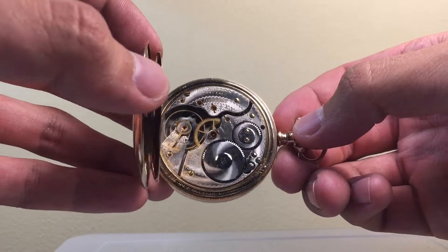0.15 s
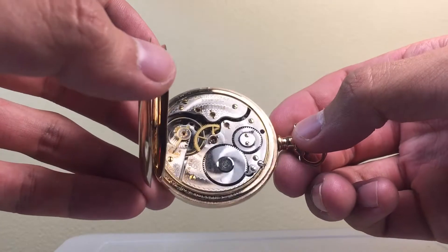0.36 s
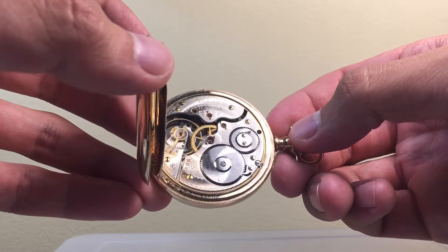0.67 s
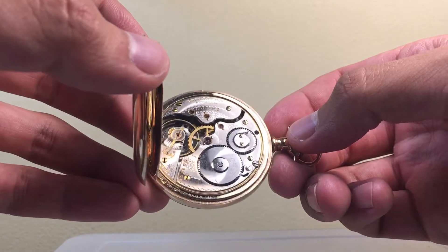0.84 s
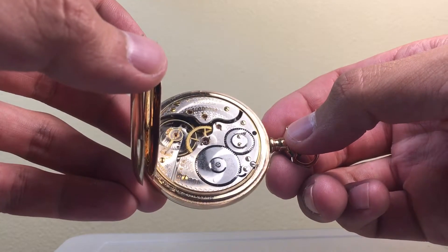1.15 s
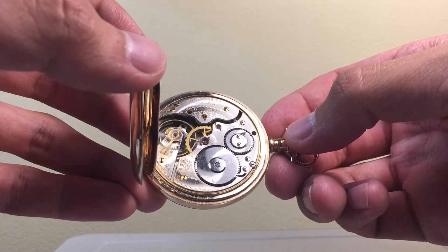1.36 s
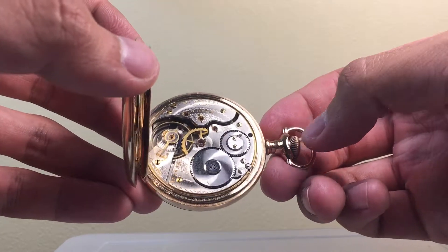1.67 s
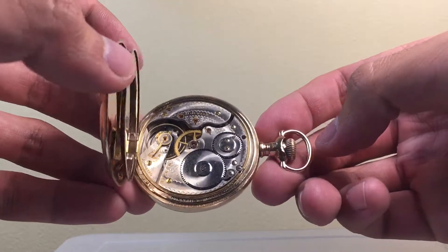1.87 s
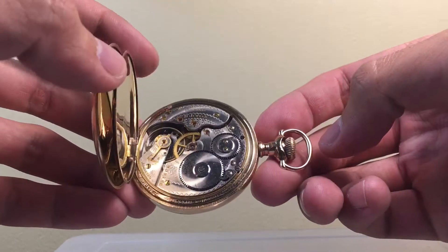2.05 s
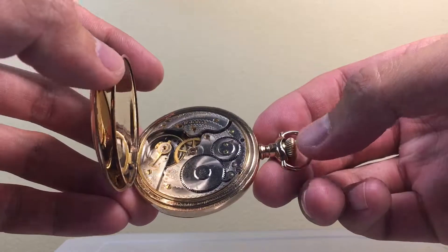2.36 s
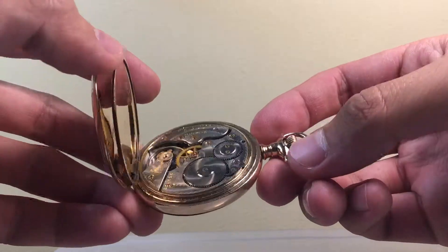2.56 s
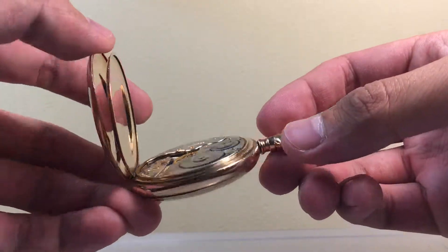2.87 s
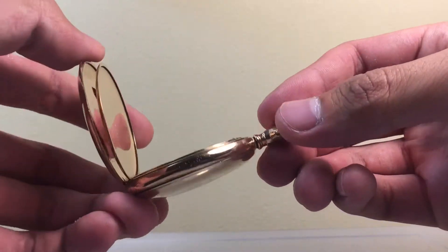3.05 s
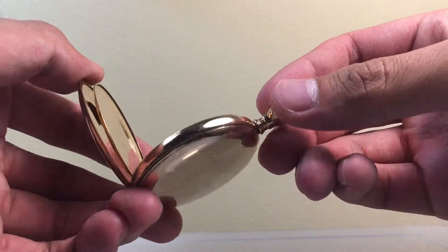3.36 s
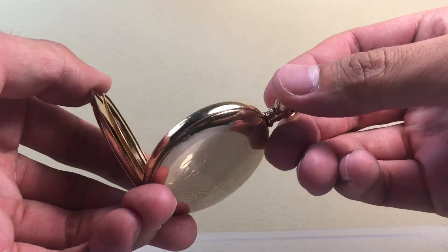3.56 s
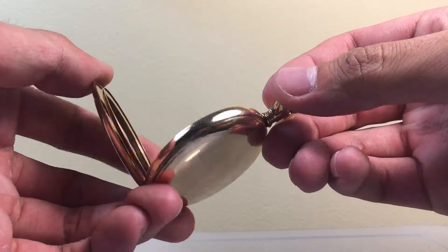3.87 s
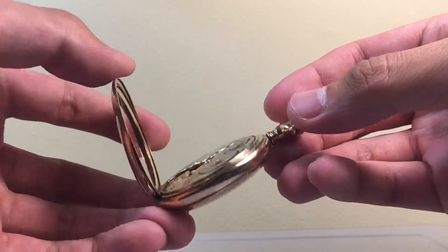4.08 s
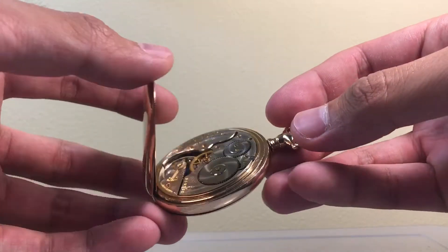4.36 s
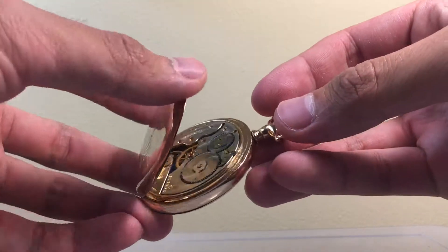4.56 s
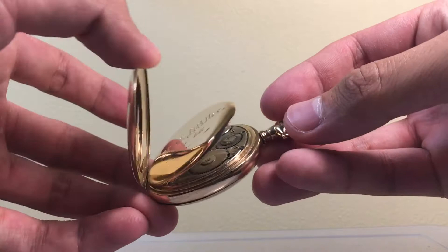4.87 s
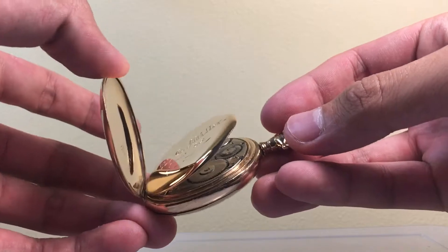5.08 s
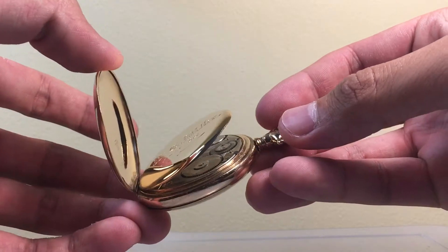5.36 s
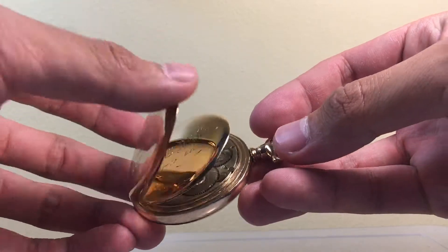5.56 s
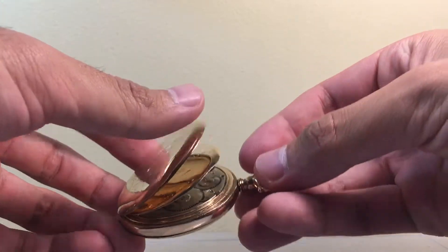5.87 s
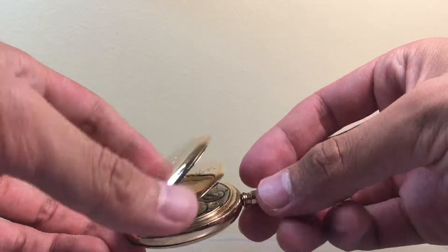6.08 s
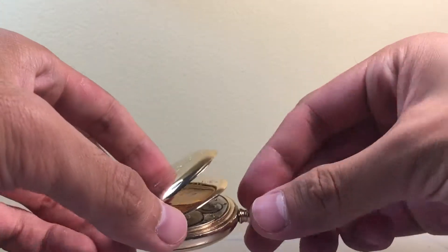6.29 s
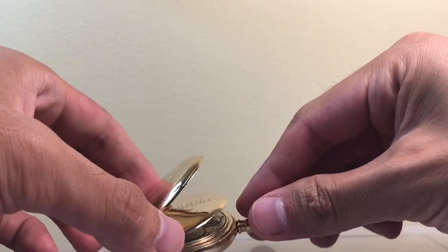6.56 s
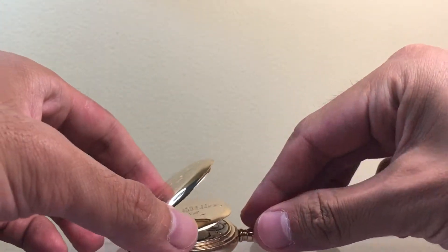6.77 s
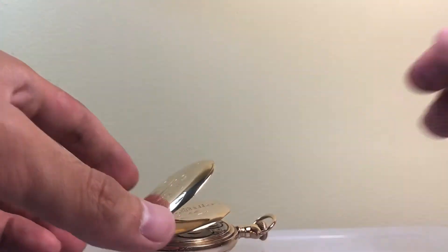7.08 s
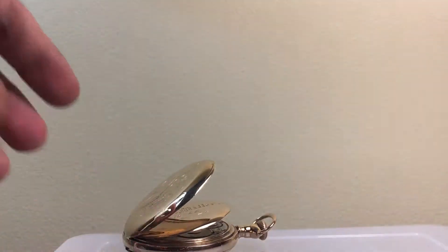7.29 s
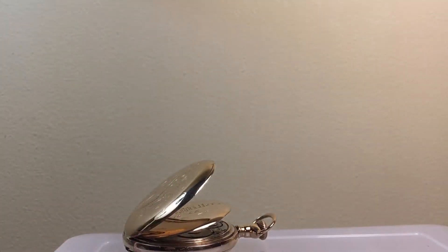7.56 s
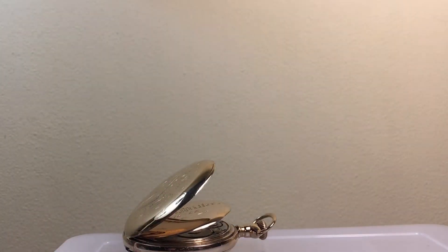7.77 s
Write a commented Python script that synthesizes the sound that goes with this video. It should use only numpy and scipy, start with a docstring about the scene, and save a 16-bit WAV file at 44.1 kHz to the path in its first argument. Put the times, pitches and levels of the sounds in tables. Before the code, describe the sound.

A pocket watch ticks quickly while being handled, its cover snaps open, and it is set down on a plastic box with a hollow knock.

```python
"""An open pocket watch ticks five times a second as it is turned in the hands: each beat is a series of
tiny impacts in the escapement that set the plates and case ringing. A lamp buzzes faintly, its
resonances driven by the mains, in a quiet ventilated room. Bow and hinge click, the inner cover snaps
open and a fingertip slips on the case. The watch is set down on a hollow plastic box, whose walls
boom at the blow and answer light nudges; let go, the case rocks and chatters to rest."""
import sys
import numpy as np
from scipy import signal
from scipy.fft import rfft, irfft, next_fast_len
from scipy.io import wavfile

SR = 44100
rng = np.random.default_rng(int(sys.argv[2]) if len(sys.argv) > 2 else 0)


def wav_record(signal):
    """Record a signal, one row per channel, as 16-bit PCM in the file named by sys.argv[1]."""
    frames = np.transpose(np.atleast_2d(signal))
    bounded = np.clip(frames, -1, 1)
    # unit amplitude maps onto the largest positive 16-bit level
    quanta = np.round(bounded * 32767).astype(np.int16)
    wavfile.write(sys.argv[1], SR, quanta)


N = 349713
TIME = np.arange(N) / SR
AGE = TIME[:SR // 2]   # seconds since a blow
SCATTER_DB = 3   # spread of a mode's strength from blow to blow


def from_db(db):
    """Amplitude grows tenfold for every 20 dB."""
    return 10 ** (np.asarray(db) / 20)


def rms_one(x):
    """Normalisation to unit mean power."""
    return x / np.sqrt(np.mean(x ** 2) + 1e-20)


def decay(t60):
    """Exponential damping: 60 dB are lost in t60 seconds."""
    return np.exp(-np.log(1000) * AGE / t60)


def colour(white, spectrum):
    """Spectral shaping: noise of unit rms, silent beyond the ends of the given spectrum."""
    hz, db = np.transpose(spectrum)
    bins = np.fft.rfftfreq(len(white), 1 / SR)
    gain = from_db(np.interp(np.log(bins + 1e-9), np.log(hz), db, left=-np.inf, right=-np.inf))
    return rms_one(irfft(rfft(white) * gain, len(white)))


def burst(spectrum, t60):
    """High modal density: countless close modes, struck together, merge into decaying noise."""
    return colour(rng.standard_normal(len(AGE)), spectrum) * decay(t60)


def ring(modes, vary_db=0, phase=0):
    """Modal superposition: a struck body vibrates as a sum of damped sinusoids."""
    return sum(from_db(db + vary_db * rng.normal()) * decay(t60) * np.sin(2 * np.pi * hz * AGE + phase)
               for hz, db, t60 in modes)


def add(out, s, sound):
    """Linear superposition: a sound joins the mix at s seconds."""
    at = max(round(s * SR), 0)
    out[at:at + len(sound)] += sound[:max(N - at, 0)]


def high_pass(x, hz):
    """A second-order filter: the lows fall by 12 dB an octave."""
    return signal.sosfilt(signal.butter(2, hz, "high", fs=SR, output="sos"), x)


def along(curve, s):
    """Linear interpolation of each column of a curve at s seconds."""
    times, *columns = np.transpose(curve)
    return [np.interp(s, times, column) for column in columns]


# The movement turns and is shaded by the hands. Each row: time in seconds, level of a drop in dB,
# lift above 11 kHz in dB.
FACING = [(0, -51.5, 7), (1.7, -52, 11), (2.5, -52, 10), (3.05, -55.5, 6), (3.6, -59.5, 5), (4.15, -52, 3),
          (4.5, -55.5, 7.5), (5.6, -53.5, 6.5), (6.1, -60, 4), (6.45, -55.5, -1), (7.1, -58.5, -2),
          (7.9, -59.5, 9)]
# The case rings more once let go. Each row: time in seconds, gain of its free modes in dB.
FREEDOM = [(0, -24), (6.8, -28), (7.03, -5), (7.25, -2.5), (7.43, 1.5), (7.93, 2)]
# Entry pallet, then exit pallet. Each row: lead of unlocking in seconds, gain in dB, lever gain in dB.
PALLETS = [(0.0192, 0, -17.5), (0.0206, 0.4, -21)]
# Plates and case under a beat. Each row: frequency in Hz, relative spectral density in dB.
CASE_SPECTRUM = [(2000, -13), (5000, -10.5), (6200, -13), (7200, 0), (8300, 4.5), (9600, 2), (10500, -7.5),
                 (11800, -2), (12700, -0.5), (14300, -1.5), (15500, -9), (16500, -33)]
# Modes of the pallets (a list for each), the free case and the lever. Each row: frequency in Hz,
# relative level in dB, t60 in seconds.
PALLET_MODES = [
    [(7000, -9, 0.028), (9700, -18, 0.036), (11600, -24, 0.022)],
    [(8160, -8, 0.027), (11000, -16, .03), (12350, -9, .03)],
]
FREE_CASE_MODES = [(7060, 6, 0.042), (9660, -4, 0.037), (8400, -14, .04)]
LEVER_MODES = [(3700, -3.5, .025), (4220, -1, 0.045), (5450, -3, .02)]


def beat(s, pallet, voice, t60=0.026, modes_db=-1.0, lever_follows=0.31, chance=0.83):
    """Impact excitation: five contacts of steel on jewel, returned as (seconds after the drop, sound)."""
    unlock_db, impulse_db, rebound_db, rebound_spread_db = -16, -21, -8.5, 4.5   # relative to the drop
    drop_db, bright_db = along(FACING, s)
    free_db, = along(FREEDOM, s)
    lead_s, pallet_db, lever_db = PALLETS[pallet]
    spectrum = [(hz, db + bright_db * (hz > 11000)) for hz, db in CASE_SPECTRUM]
    envelope = decay(t60) + from_db(2.0) * decay(0.0055)   # ringing plates and a very short crack

    def contact(db):
        """Partial correlation: a pallet keeps its own voice but is never struck quite alike."""
        return from_db(db) * colour(voice + chance * rng.standard_normal(len(AGE)), spectrum) * envelope

    pallet_ring = from_db(modes_db) * ring(PALLET_MODES[pallet], SCATTER_DB)
    case_ring = from_db(free_db) * ring(FREE_CASE_MODES, SCATTER_DB)
    # the lever is heard best while the open movement faces the listener
    lever_gain = from_db(lever_db + lever_follows * bright_db)
    contacts = [
        (-lead_s, contact(unlock_db) + 0.78 * lever_gain * ring(LEVER_MODES, SCATTER_DB)),
        (-lead_s + rng.uniform(0.001, 0.0032), contact(impulse_db)),
        (-lead_s * rng.uniform(0.5, 0.6), contact(impulse_db)),
        (0, contact(0) + pallet_ring + case_ring + lever_gain * ring(LEVER_MODES, SCATTER_DB)),   # drop
        (rng.uniform(0.0022, 0.0036), contact(rebound_db + rebound_spread_db * rng.normal()))]
    return [(lag, from_db(drop_db + pallet_db) * sound) for lag, sound in contacts]


# The rate wanders with tilt. Each row: time in seconds, lag behind an even count in seconds.
BEAT_LAG = [(0, .0365), (.6, .036), (2.4, .032), (4.6, .0314), (5.3, .0293), (6.5, .0286), (7.2, .031)]


def escapement(beat_s, beat_error_s):
    """Periodic impacts: two pallets catch the escape wheel in turn; out of beat, each tock is early."""
    out = np.zeros(N)
    voices = rng.standard_normal((2, len(AGE)))
    for k, count_s in enumerate(np.arange(0, TIME[-1], beat_s)):
        pallet = k % 2
        s = count_s + along(BEAT_LAG, count_s)[0] - beat_error_s * pallet
        for lag, sound in beat(s, pallet, voices[pallet]):
            add(out, s + lag, sound)
    return out


def mains_kicks(alternate_gain, skew_s, start_s, mains_hz=59.982):
    """An impulse train: one kick per half wave, every second one scaled and delayed by the skew."""
    kicks = np.zeros(N)
    for k in range(int(TIME[-1] * 2 * mains_hz)):
        at = (start_s + k / (2 * mains_hz) + skew_s * (k % 2)) * SR
        impulse = np.sinc(np.arange(-8, 9) - at % 1)   # falls between samples
        add(kicks, int(at) / SR, alternate_gain ** (k % 2) * impulse)
    return kicks


# Hands shade the lamp. Each row: time in seconds, relative levels of lower and upper resonance in dB.
BUZZ_LEVELS = [(0.0, -74, -77), (0.4, -79.5, -77.5), (1.5, -79, -75.5), (2.27, -72.5, -74.5),
               (2.72, -76.5, -77), (3.5, -71, -80), (4.25, -72.5, -83), (4.7, -70, -69.5),
               (5.1, -71.5, -78.5), (5.8, -72, -73), (6.5, -79, -80.5), (7.93, -76.5, -74.5)]
# The lamp's two resonances. Each row: frequency in Hz, relative level in dB, t60 in seconds.
LAMP_LOWER_MODES = [(7300, -2.5, .022), (7380, 3.5, 0.021), (7480, 2, 0.025)]
LAMP_UPPER_MODES = [(7650, 21, 0.0078), (7480, -13.5, 0.0053)]
# Loose parts of the lamp. Each row: frequency in Hz, relative spectral density in dB.
SIZZLE_SPECTRUM = [(4500, -16), (5400, 0.5), (5750, -14), (6050, 1), (6800, 0.5), (8600, -10), (9500, -4.5),
                   (10150, -9), (11400, -16), (12500, -5), (13900, -9), (14900, -3), (15700, -6)]


def lamp(lower_gain_db, upper_gain_db, sizzle_db, sizzle_t60, sizzle_follows):
    """Forced vibration: the current kicks two resonances to and fro, and loose parts sizzle in step."""
    swing = mains_kicks(alternate_gain=-0.95, skew_s=0.000005, start_s=0.0047)
    lower_db, upper_db = along(BUZZ_LEVELS, TIME)
    buzz = np.zeros(N)
    for db, modes in [(lower_db + lower_gain_db, LAMP_LOWER_MODES),
                      (upper_db + upper_gain_db, LAMP_UPPER_MODES)]:
        # passing the resonance twice, each kick swells and fades softly
        response = signal.fftconvolve(ring(modes), ring(modes))
        buzz += from_db(db) * rms_one(signal.fftconvolve(swing, response)[:N])
    shaking = mains_kicks(alternate_gain=0.7, skew_s=0, start_s=0.0045)
    sizzle = signal.fftconvolve(shaking, burst(SIZZLE_SPECTRUM, sizzle_t60))[:N]
    shade_db = sizzle_follows * (lower_db - lower_db.mean())
    return buzz + from_db(sizzle_db + shade_db) * rms_one(sizzle)


# Ventilation rumble, moving air and hiss. Each row: frequency in Hz, relative spectral density in dB.
RUMBLE_SPECTRUM = [(15, -58), (25, -16), (30, -30), (39, -9), (59, 2), (70, 0.5), (91, -9), (123, -2),
                   (155, -5.5), (188, -9.5), (215, -6.5), (258, -16), (353, -17.5), (450, -29), (580, -57),
                   (990, -120)]
AIR_SPECTRUM = [(240, -19), (400, -3), (470, 0), (655, 0.5), (795, -3.5), (1610, -4), (1820, -7.5),
                (2250, -3), (2700, -11), (3420, -10), (4290, -14), (4820, -16), (5200, -21), (6760, -36),
                (11400, -120)]
HISS_SPECTRUM = [(4300, -30), (5200, 0.5), (7500, 7), (9000, -1), (10700, -0.5), (13000, -2.5), (15000, -5),
                 (15700, -20), (15900, -42)]
# Faint steady tones. Each row: frequency in Hz, rms level in dB.
WHINES = [(215, -71.5), (2000, -86.5), (2331, -86.5), (3365, -88.5)]


def room_tone(rumble_db, air_db, hiss_db):
    """Stationary noise: three independent bands add in power, along with a few pure tones."""
    bands = [(RUMBLE_SPECTRUM, rumble_db), (AIR_SPECTRUM, air_db), (HISS_SPECTRUM, hiss_db)]
    noise = sum(from_db(db) * colour(rng.standard_normal(next_fast_len(N)), spectrum)[:N]
                for spectrum, db in bands)
    tones = sum(from_db(db) * np.sqrt(2) * np.sin(2 * np.pi * hz * TIME) for hz, db in WHINES)
    return noise + tones


# Clicks of bow and hinge. Each row: start in seconds, body gain in dB, body frequency in Hz,
# body width in octaves, treble gain in dB.
CLICKS = [(1.7335, -47.5, 1250, 0.23, -47), (2.8662, -57, 1250, 0.33, -68), (3.031, -56, 1270, 0.37, -70),
          (3.5126, -57.5, 1700, .8, -68), (5.9748, -36, 1450, 0.54, -49.5),
          (6.239, -54.5, 1310, 0.8, -58.5)]
# A click's bright edge. Each row: frequency in Hz, relative spectral density in dB.
CLICK_TREBLE = [(1800, -6), (2800, -3.5), (3900, -1), (4700, -7), (5600, -5), (7000, -16), (10000, -18),
                (16000, -19)]


def bow_and_hinge(body_t60, treble_t60):
    """Heavy damping: under the fingers each click is one broad resonance with a bright edge."""
    out = np.zeros(N)
    for s, body_db, hz, width, treble_db in CLICKS:
        hump = [(hz * 2 ** (width * step), -11 * abs(step)) for step in range(-2, 3)]
        body = from_db(body_db) * burst(hump, body_t60)
        edge = from_db(treble_db) * burst(CLICK_TREBLE, treble_t60)
        add(out, s, body + edge)
    return high_pass(high_pass(out, hz=750), hz=750)   # the clicks carry no bass below about 750 Hz


# The inner cover leaves its rim. Each row: start in seconds, relative level in dB.
SNAPS = [(4.047, -33.5), (4.0478, -32), (4.0517, -37.5), (4.054, -40)]
# Its crack. Each row: frequency in Hz, relative spectral density in dB.
COVER_CRACK = [(500, -32), (1200, -27), (1900, -8), (2500, -3.5), (3500, -14.5), (4700, 4.5), (5300, 2.5),
               (5800, -16), (8000, 2), (10400, -14), (11400, 4.5), (13500, -2.5), (16000, -7)]
# Its modes. Each row: frequency in Hz, relative level in dB, t60 in seconds.
COVER_MODES = [(1870, -13.5, 0.087), (2255, -1, 0.094), (2590, -10, 0.048), (4560, -5, 0.074),
               (4630, -25, 0.26), (5190, -17, .13), (5330, -26, .3), (6440, -12, 0.043), (7670, -4, 0.052),
               (8300, -3.5, .055), (11080, -6, .06), (11700, -8, .05), (11900, -11, .06), (13400, -13, .06),
               (14100, -16, .07), (15050, -12, .06)]


def cover(crack_db, crack_t60, ring_db):
    """Free vibration: the thin metal cover slips off its rim in jerks and rings from the strongest."""
    out = np.zeros(N)
    for s, db in SNAPS:
        add(out, s, from_db(db + crack_db) * burst(COVER_CRACK, crack_t60))
    s, db = max(SNAPS, key=lambda snap: snap[1])
    add(out, s, from_db(db + ring_db) * ring(COVER_MODES))
    return out


# A fingertip drags on the case. Each row: centre and length in seconds, level in dB, frequency in Hz.
RUBS = [(4.244, 0.092, -59.5, 327)]


def fingertip():
    """Stick-slip friction: skin on the polished case gives a brief low note."""
    out = np.zeros(N)
    for centre_s, length_s, db, hz in RUBS:
        swell = np.sin(np.pi * np.minimum(AGE / length_s, 1))
        add(out, centre_s - length_s / 2, from_db(db) * swell * np.sin(2 * np.pi * hz * AGE))
    return out


# The hollow plastic box. Each row: frequency in Hz, relative level in dB, t60 in seconds.
BOX_MODES = [(74.4, -3.5, 0.14), (105, -6, 0.049), (131, -7, 0.14), (153, 2.5, 0.16), (214.4, 3, 0.12),
             (237, -2, 0.18), (280, 1.5, 0.06), (347, -7, 0.12), (393, 1, 0.02), (424, -10.5, 0.12),
             (485, -12, 0.074), (556, -10, 0.16), (659, -7, .04), (730, -4.5, 0.08), (806, 8, 0.03),
             (1050, -12, 0.087), (1190, -3, 0.018)]


def box(pushes):
    """Contact time limits bandwidth: the longer a pulse of force lasts, the duller the box sounds."""
    out = np.zeros(N)
    # the walls radiate with their velocity, so every mode starts at its crest
    response = ring(BOX_MODES, phase=np.pi / 2)
    for s, db, contact_s in pushes:
        force = np.sin(np.pi * np.minimum(AGE / contact_s, 1)) ** 2
        add(out, s, from_db(db) * signal.fftconvolve(response, force / force.sum())[:len(AGE)])
    return high_pass(out, hz=45.4)


# Fingers touch the box. Each row: start in seconds, relative level in dB, contact time in seconds.
NUDGES = [(6.172, -48.5, 0.0022), (6.195, -51.5, 0.0021), (6.3415, -50.5, 0.0026), (6.419, -55.5, 0.0017),
          (6.8802, -44.5, 0.0026), (6.944, -51.5, 0.0021), (6.975, -45.5, 0.0023), (7.177, -55, 0.0027)]


def nudges(low_cut_hz):
    """Selective excitation: light touches stir mainly the upper modes of the box."""
    return high_pass(box(NUDGES), low_cut_hz)


# The watch meets the box. Each row: start in seconds, relative level in dB, contact time in seconds.
LANDING = [(6.5769, -34.5, 0.00038), (6.5779, -23, 0.0014), (6.5807, -26.5, 0.0017)]
# Crack of the box and shiver of its lid. Each row: frequency in Hz, relative spectral density in dB.
BOX_CRACK = [(300, -4), (700, 1), (1250, -2), (1900, -10.5), (2700, -12), (3800, -6.5), (5200, -12),
             (6700, -18), (8100, -17), (11200, -21), (13000, -27), (16000, -29)]
BOX_RATTLE = [(90, -1), (200, -2), (400, -6), (700, -4), (1050, -14), (1600, -17), (2500, -23), (3500, -27),
              (6000, -35), (12000, -38), (16000, -46)]


def landing(crack_db, crack_t60, rattle_db, rattle_t60):
    """Impact on a hollow shell: metal cracks against plastic, the walls boom and the lid shivers."""
    out = box(LANDING)
    touch_s = LANDING[0][0]
    add(out, touch_s, from_db(crack_db) * burst(BOX_CRACK, crack_t60))
    add(out, touch_s, from_db(rattle_db) * burst(BOX_RATTLE, rattle_t60))
    return out


# The case rocks on its rounded back. Each row: start in seconds, relative level in dB.
ROCKS = [(7.3462, -60), (7.3488, -43.5), (7.3630, -47), (7.3655, -46), (7.385, -63), (7.398, -65),
         (7.412, -58)]
# Its scrape. Each row: frequency in Hz, relative spectral density in dB.
ROCK_SCRAPE = [(400, -24), (800, 2), (1400, -2), (2100, 7.5), (2900, -13), (4200, -3.5), (5500, -13.5),
               (7500, -8.5), (10000, -20), (16000, -27)]
# Its modes. Each row: frequency in Hz, relative level in dB, t60 in seconds.
ROCK_MODES = [(1970, -8, 0.077), (2080, 4, 0.05), (2130, -7, 0.057), (4440, -16, .07)]


def rocking(scrape_db, scrape_t60, ring_db, chatter_db, chatter_t60):
    """Rolling contact: the released case tips over the plastic in ringing jerks and chatters to rest."""
    out = np.zeros(N)
    for s, db in ROCKS:
        scrape = from_db(scrape_db) * burst(ROCK_SCRAPE, scrape_t60)
        ringing = from_db(ring_db) * ring(ROCK_MODES, SCATTER_DB)
        add(out, s, from_db(db) * (scrape + ringing))
    add(out, ROCKS[0][0], from_db(chatter_db) * burst(ROCK_SCRAPE, chatter_t60))
    return out


def room(x, wet_db, t60):
    """Reverberation: a small room answers after 4 ms with a short diffuse tail."""
    spectrum = [(100, -6), (400, 4.5), (3000, -0.5), (8000, 0.5), (16000, -5)]   # Hz, dB
    tail = burst(spectrum, t60) * (AGE > 0.004)
    return x + from_db(wet_db) * signal.fftconvolve(x, tail / np.linalg.norm(tail))[:N]


def scene():
    """Superposition: watch, handling and box reverberate over the lamp and the room tone."""
    watch = escapement(beat_s=0.2, beat_error_s=0.0044)
    snap = cover(crack_db=2.0, crack_t60=0.025, ring_db=-4.0)
    handling = bow_and_hinge(body_t60=0.023, treble_t60=0.036) + fingertip()
    knock = landing(crack_db=-20.5, crack_t60=0.015, rattle_db=-32, rattle_t60=0.14)
    touches = nudges(low_cut_hz=295)
    settling = rocking(scrape_db=-5.5, scrape_t60=0.04, ring_db=-4.0, chatter_db=-50.5, chatter_t60=0.38)
    buzz = lamp(lower_gain_db=1.5, upper_gain_db=3.0,
                sizzle_db=-78, sizzle_t60=0.019, sizzle_follows=0.34)
    foreground = room(watch + snap + handling + knock + touches + settling, wet_db=-19.5, t60=0.33)
    return (foreground + buzz + room_tone(rumble_db=-57, air_db=-69.5, hiss_db=-76.5))[None]


def record(dry):
    """Band limiting: a steep elliptic low-pass removes the treble above 16.3 kHz."""
    return signal.sosfilt(signal.ellip(10, 0.1, 80, 16300, fs=SR, output="sos"), dry)


dry = scene()
out = record(dry)
wav_record(out)
```